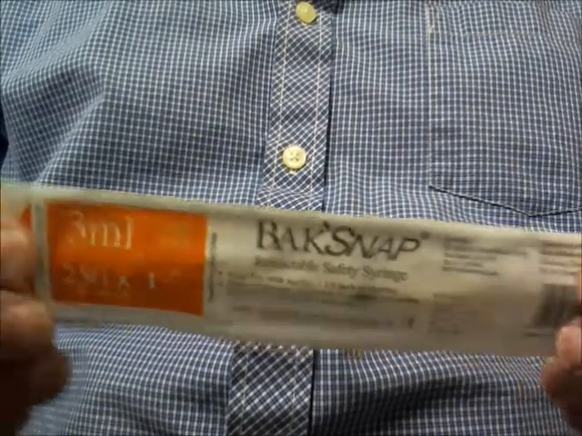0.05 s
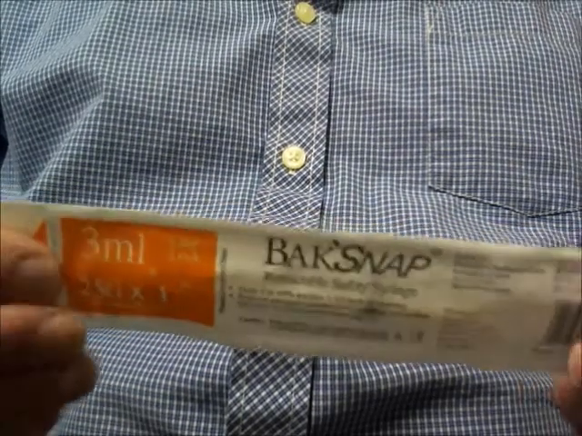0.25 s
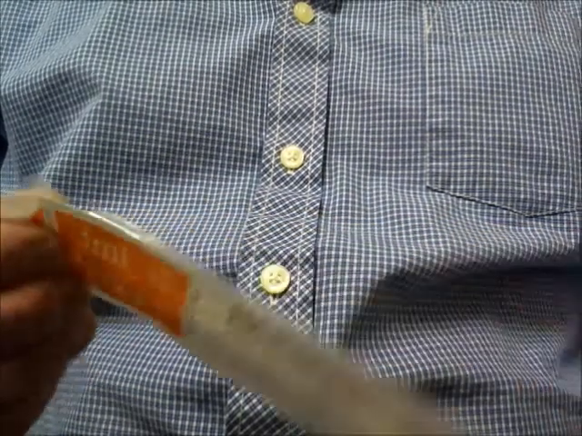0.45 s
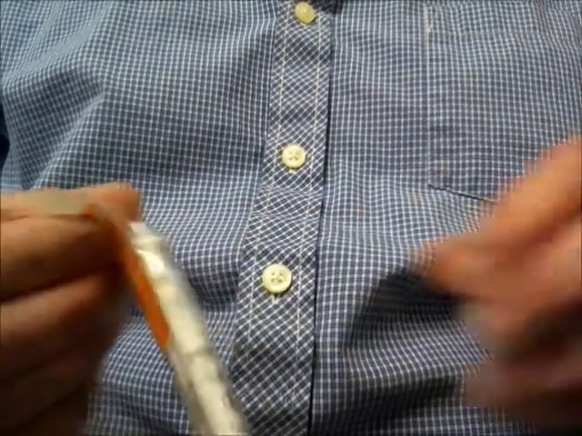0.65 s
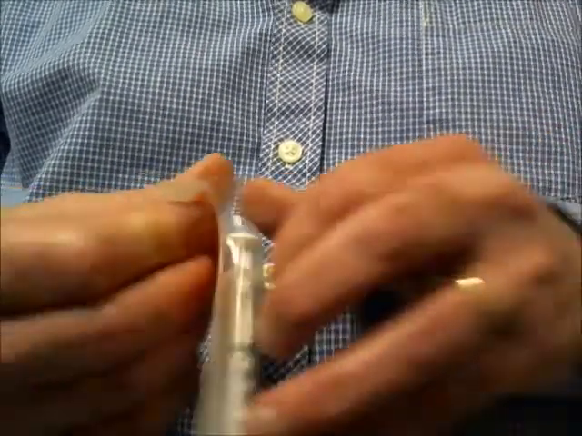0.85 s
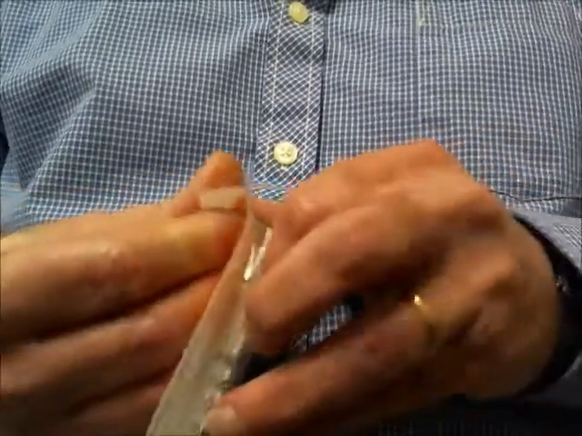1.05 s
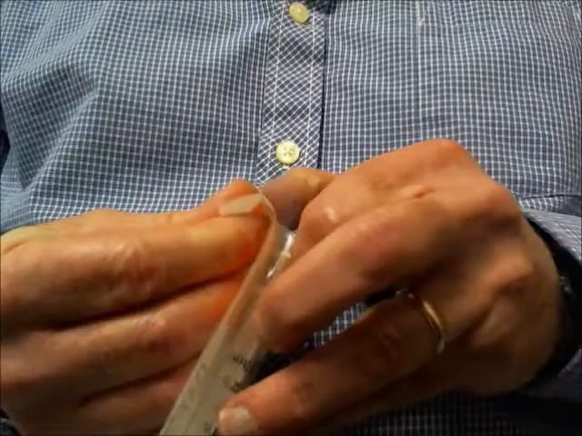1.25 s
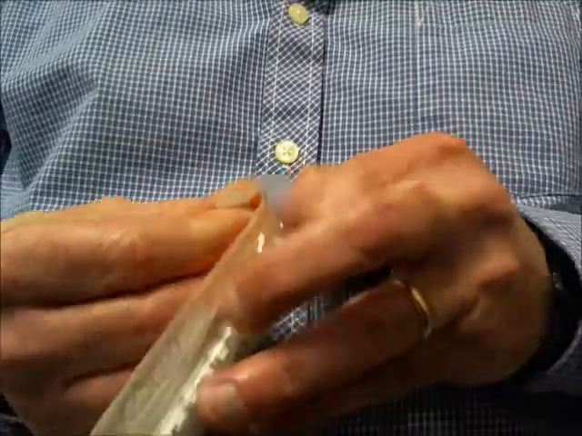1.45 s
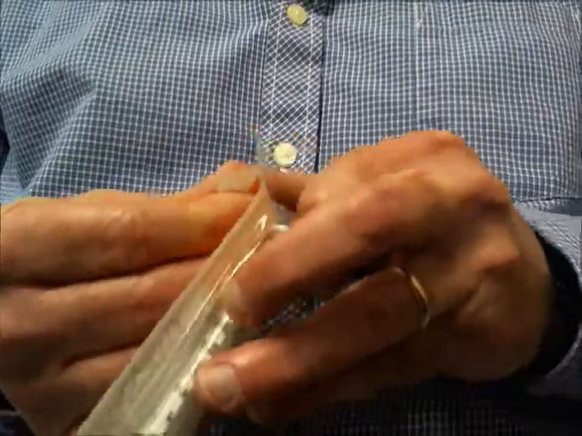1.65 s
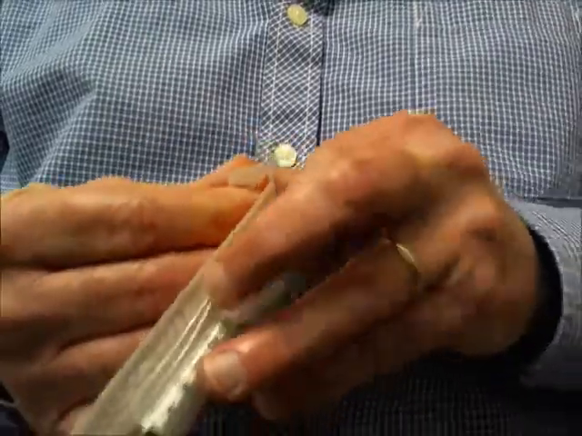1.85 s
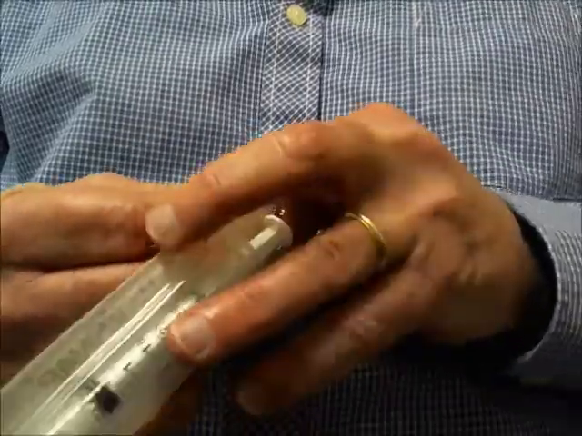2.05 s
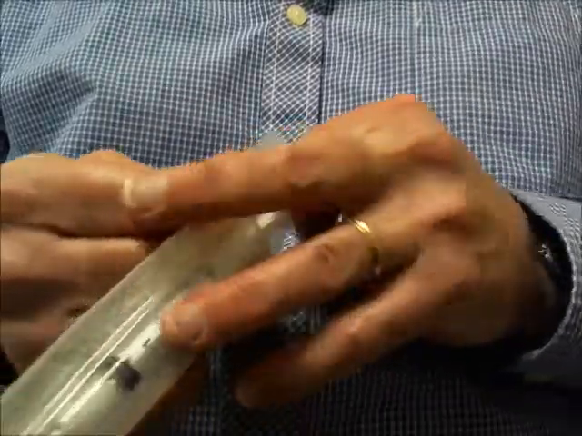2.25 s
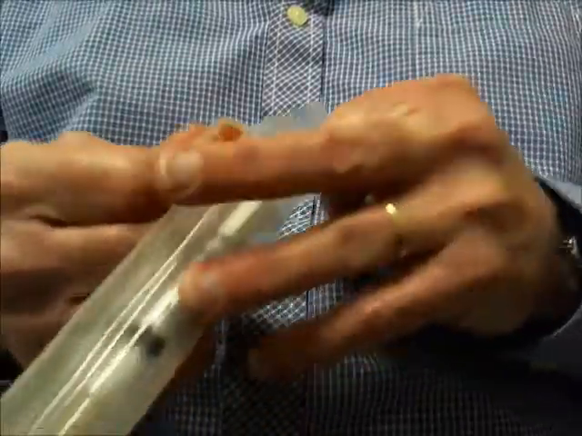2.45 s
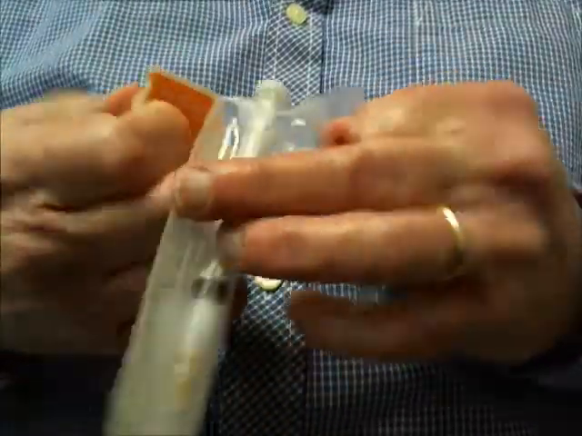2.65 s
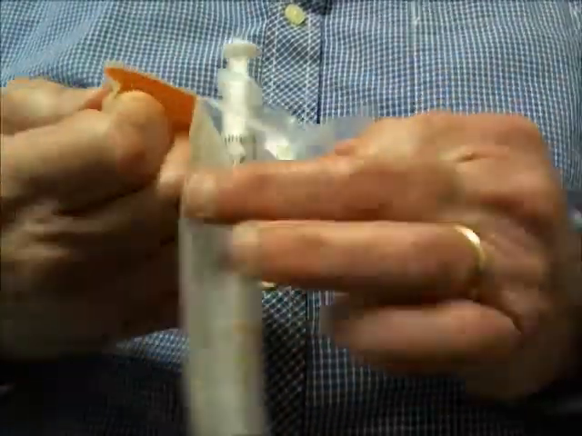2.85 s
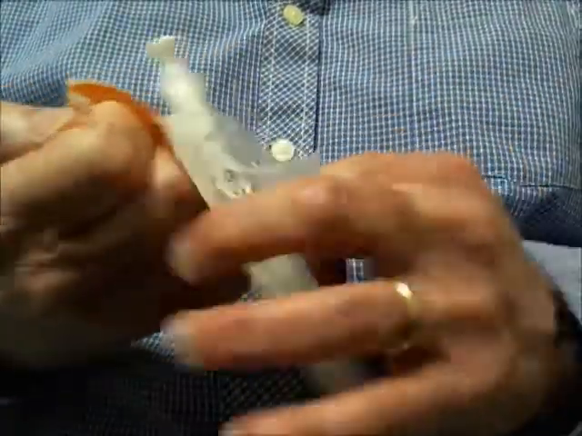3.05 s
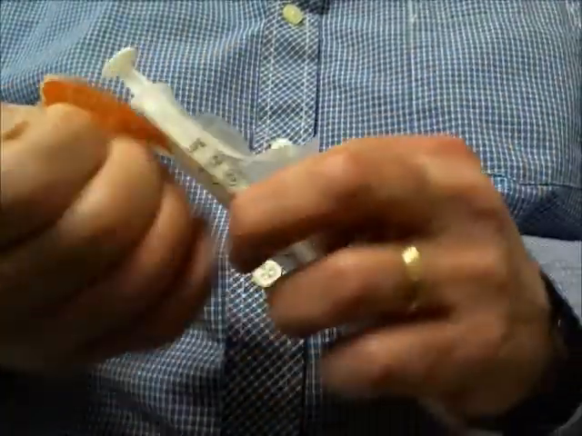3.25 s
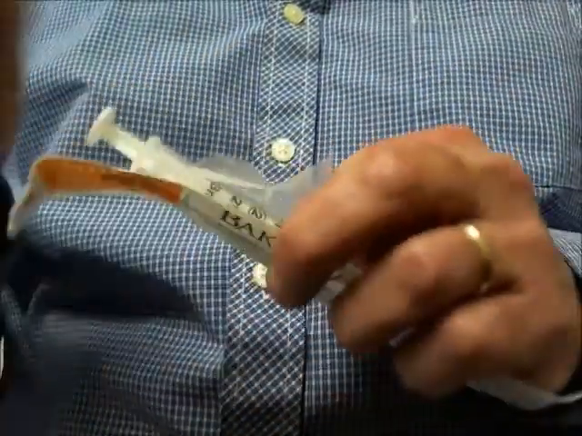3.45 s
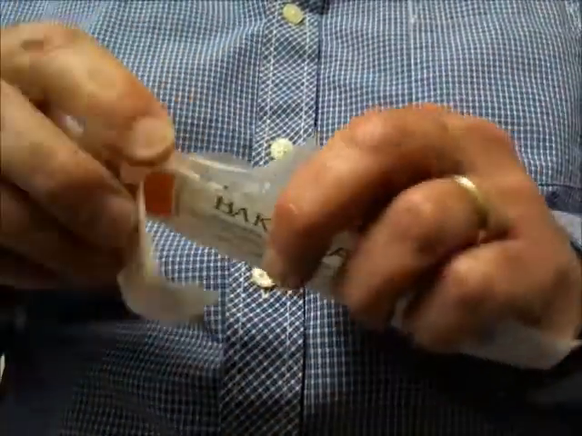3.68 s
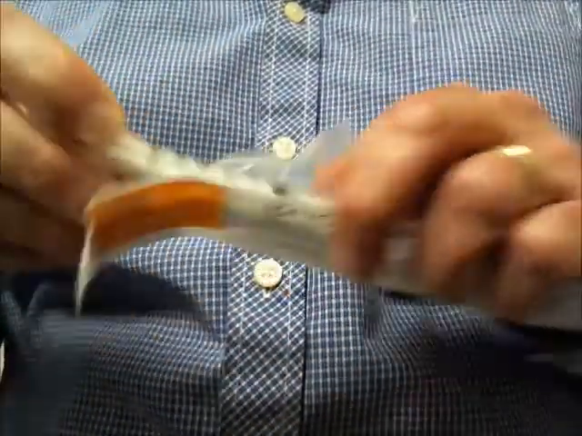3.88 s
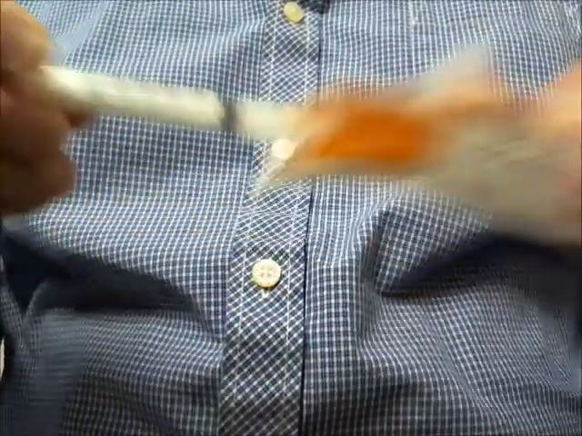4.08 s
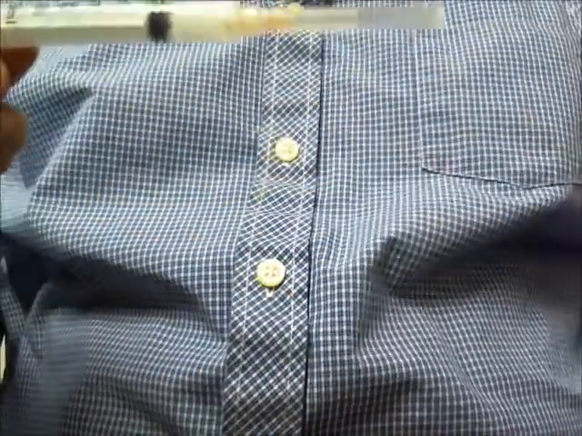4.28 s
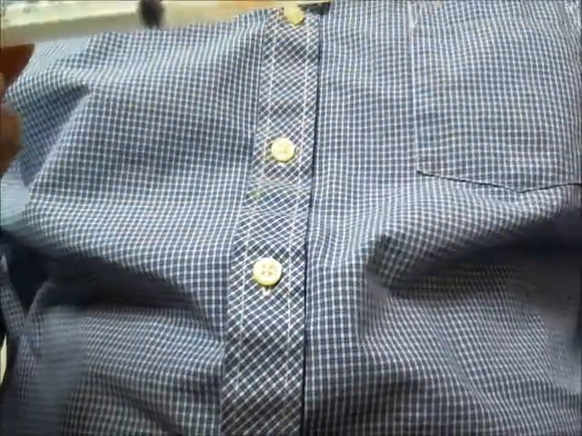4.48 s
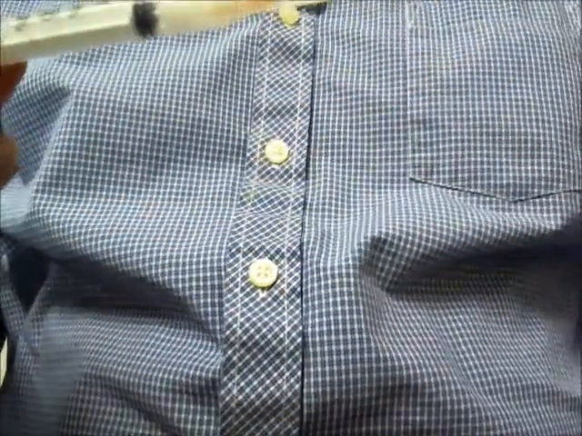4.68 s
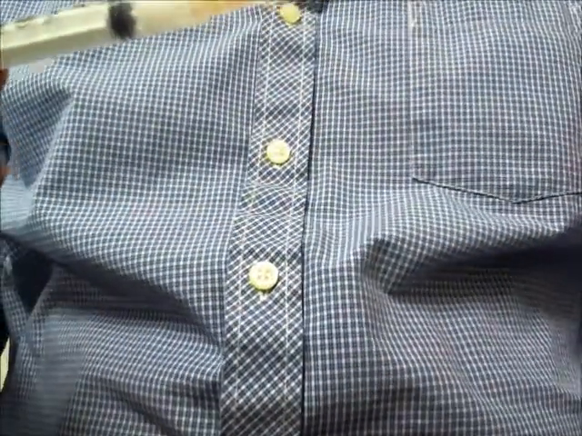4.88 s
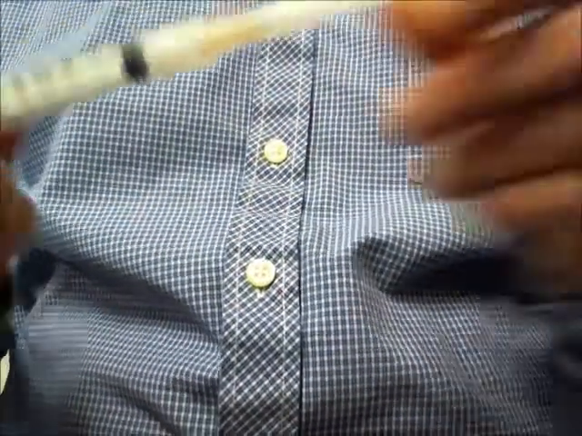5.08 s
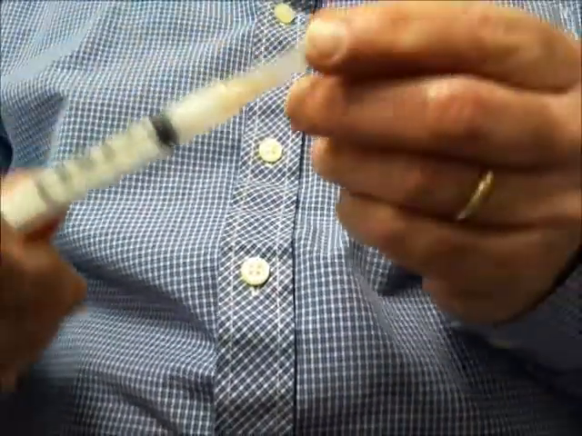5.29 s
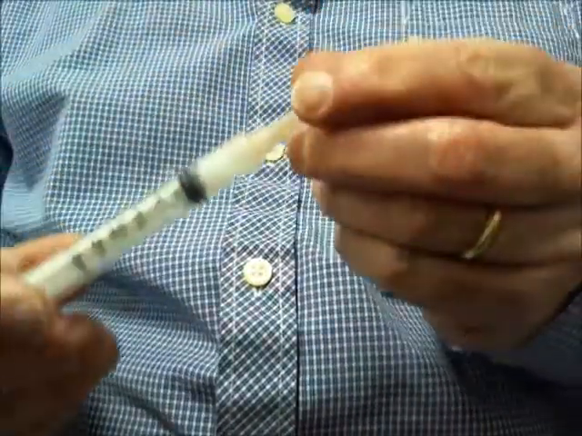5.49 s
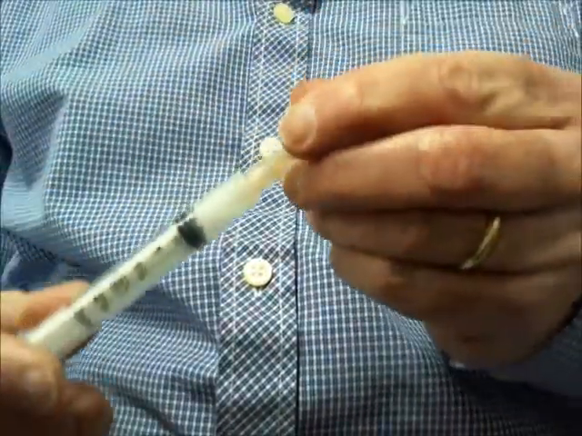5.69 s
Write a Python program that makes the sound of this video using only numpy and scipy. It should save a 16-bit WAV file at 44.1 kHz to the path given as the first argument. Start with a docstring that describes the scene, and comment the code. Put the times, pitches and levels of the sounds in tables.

```python
"""A quiet room hums first; then, close to a small microphone, hands peel open a paper-and-film pouch
and draw out a plastic syringe. Creases in the film snap as noise bursts through a resonance; the seal
tears as clumped random slips ringing many small facets, and slips and snaps ring the paper's low modes.
The loudest snaps overload the recorder. Near the end a soft far bump is followed by fingers ticking
on the cap, made as longer, sharper snaps."""
import sys
import numpy as np
from scipy import signal
from scipy.fft import rfft, irfft
from scipy.io import wavfile

SR = 44100
rng = np.random.default_rng(int(sys.argv[2]) if len(sys.argv) > 2 else 0)


def digitize_waveform(pressure):
    """Quantize a signal to 16-bit integers and store it at the path in sys.argv[1].

    Rows of a 2-D input are taken as channels; values are limited to [-1, 1].
    """
    field = np.atleast_2d(pressure).T
    bounded = np.clip(field, -1, 1)
    quanta = np.round(bounded * 32767).astype(np.int16)
    wavfile.write(sys.argv[1], SR, quanta)


N = 252574

# Background noise spectrum, relative density: frequency_hz, density_db
ROOM_SPECTRUM = [(30, -30), (70, -11), (170, -2.5), (300, -9), (600, -22.5), (1200, -25.5), (6500, -27.5),
                 (7600, -43), (9000, -47), (14000, -63.5)]
# Mains hum and electronic whine: frequency_hz, rms_db
STEADY_TONES = [(240, -74), (8000, -82.5)]
# Hand moves that bend or peel the pouch: start_s, hold_s, film_crackle_db, paper_slip_db
HAND_MOVES = [(0.174, 0.091, -59.5, -63), (0.267, 0.14, -46, -39), (0.466, 0.13, -56.5, -62),
              (0.629, 0.012, -53.5, -66), (0.733, 0.0058, -37.5, -23), (0.79, 0.076, -41.5, -47),
              (0.852, 0.1, -36, -29), (1.01, 0.097, -43.5, -57), (1.107, 0.096, -49, -53),
              (1.24, 0.076, -31.5, -34), (1.333, 0.055, -33, -35), (1.413, 0.068, -37, -34.5),
              (1.526, 0.0085, -54.5, -38), (1.633, 0.025, -39, -54), (1.724, 0.068, -42.5, -48),
              (1.798, .11, -26.5, -35), (1.894, 0.14, -40.5, -45.5), (2.055, 0.029, -38, -33.5),
              (2.208, 0.068, -14, -11), (2.28, .07, -27.5, -21), (2.363, 0.066, -22.5, -12),
              (2.464, 0.26, -32.5, -25), (2.6, 0.07, -18, -12), (2.712, 0.077, -52.5, -46),
              (2.79, 0.049, -32, -26), (2.888, 0.086, -50, -37.5), (2.997, 0.091, -29.5, -34),
              (3.134, 0.099, -41, -48), (3.483, 0.042, -59.5, -38.5), (3.71, 0.16, -30.5, -30),
              (3.898, 0.1057, -23.5, -28.5), (3.987, 0.023, -20.5, -38.5), (4.041, 0.012, -30.5, -54),
              (4.125, 0.12, -44.5, -62), (4.269, 0.076, -44, -38), (4.458, 0.015, -54, -41),
              (4.515, .06, -33.5, -29), (4.577, 0.021, -29, -18.5), (4.608, 0.1, -42.5, -36.5),
              (4.767, 0.01, -42, -49)]
# Colour of the film sounds at the microphone, relative density: frequency_hz, density_db
FILM_SPECTRUM = [(150, -35.5), (300, -19), (700, -10.5), (1800, -4.5), (3300, -0.5), (4800, -1.5),
                 (6500, -1), (7500, -9), (11300, -13), (12600, -44.5), (16000, -58.5)]
# Low modes of the pouch's paper backing: frequency_hz, width_hz, gain_db
PAPER_MODES = [(251.5, 74, -13.5), (506, 93, -8.5), (679, 150, -4.5), (900, 460, 1), (1400, 350, -3),
               (1850, 1000, -8.5)]
# Film creases snapping through: start_s, peak_db, ring_hz
CREASE_SNAPS = [(0.2702, 9, 4400), (0.304, -28, 3240), (0.315, -20, 3980), (0.3573, 6.5, 5250),
                (0.3817, -27, 5500), (0.4138, -16.5, 1750), (0.478, -24, 4240), (0.5688, -25, 4940),
                (0.7345, -2, 4920), (0.8007, -14, 4830), (0.814, -14, 4060), (0.831, -7.5, 4400),
                (0.8706, -10, 3820), (0.8859, -2, 4450), (0.892, -3, 4330), (0.9095, 2.5, 3220),
                (0.9304, -3, 3500), (0.9502, -16, 4200), (0.959, -26, 3580), (0.998, -14, 3700),
                (1.0048, 1.5, 5140), (1.0237, -9, 5200), (1.1158, -13, 4930), (1.131, -12, 4000),
                (1.1544, -10, 4180), (1.1643, -2, 4100), (1.1696, -11.5, 3570), (1.2191, -1.5, 3850),
                (1.256, -15, 3720), (1.2919, -3.5, 3360), (1.339, -14, 3980), (1.3522, -11, 4240),
                (1.3584, -15, 4000), (1.3808, -12, 3700), (1.4401, -6, 3870), (1.457, 4.5, 3860),
                (1.605, -28.5, 3280), (1.6287, -11, 4500), (1.7409, -18, 3650), (1.8022, 0, 4870),
                (1.813, 1.5, 3750), (1.8438, 2, 3560), (1.854, 11, 5400), (1.892, -5, 4470),
                (1.9674, -19, 5330), (1.9811, 3, 6040), (2.0673, -14, 4760), (2.1454, -21, 4440),
                (2.1819, -0.5, 4430), (2.1936, -10, 4070), (2.206, 5, 4270), (2.2177, -4.5, 3870),
                (2.224, 8, 4500), (2.2607, 3, 4430), (2.2769, -4, 4340), (2.2855, -2, 4800),
                (2.3091, -3.5, 3450), (2.3184, 3, 3900), (2.3619, 8, 4500), (2.3656, 7.5, 3930),
                (2.3783, 7, 2870), (2.3907, 0.5, 4440), (2.4017, -8, 4270), (2.409, 3, 4700),
                (2.4363, 1.5, 4040), (2.478, -5.5, 3756), (2.5114, 1, 4900), (2.5475, -9, 3910),
                (2.5573, -8, 3030), (2.611, 0.5, 4050), (2.6327, -3, 5350), (2.6444, -3, 5050),
                (2.6553, 2.5, 4640), (2.6928, -11.5, 6800), (2.7374, -8, 4720), (2.7827, -15.5, 3485),
                (2.804, -10, 2500), (2.8366, -2, 4830), (2.9076, -8.5, 3600), (2.95, -13.5, 2950),
                (2.9984, -7, 5100), (3.0321, 3.5, 5450), (3.1027, 0.5, 5700), (3.19, -6.5, 4660),
                (3.2325, -13.5, 6050), (3.3375, -15, 4010), (3.4384, -12, 4120), (3.6379, -1, 5250),
                (3.6503, -14, 3800), (3.6982, -11, 4300), (3.7085, -7.5, 6860), (3.7159, -12.5, 3370),
                (3.7252, -7, 5960), (3.8027, 8, 4500), (3.8573, -3.5, 4120), (3.9938, 1, 5030),
                (4.041, -9.5, 5500), (4.0469, -6.5, 5700), (4.1344, -11.5, 4700), (4.156, -20.5, 3770),
                (4.1751, -18.5, 4570), (4.2038, -14.5, 4300), (4.2919, -12, 5900), (4.342, -26.5, 4440),
                (4.37, -24.5, 5830), (4.44, -34, 1400), (4.5074, -20.5, 5940), (4.5369, 1, 3940),
                (4.576, 2.5, 4770), (4.6614, -11, 4040), (4.6713, -21, 4650), (4.7016, -12.5, 4670),
                (4.8657, -32.5, 5360), (4.9084, -35, 9100)]
# One soft far bump: start_s, end_s, frequency_hz, top_rms_db
FAR_BUMP = (5.055, 5.15, 180, -52)
# Fingers on the plastic cap: start_s, peak_db, ring_hz
CAP_TICKS = [(5.1262, -39, 3310), (5.5007, -49.5, 4780), (5.5378, -46.5, 2690), (5.58, -49, 2560),
             (5.6342, -45.5, 1400), (5.7157, -35.5, 2580)]

ROOM_TONE_DB = -64  # rms
ONSET_DB_PER_S, SETTLE_DB_PER_S = 1198.5, 1001  # how fast a move builds and dies away
BEFORE_DB_PER_S, AFTER_DB_PER_S = 2497.5, 700.5  # how fast small sounds build to a snap and die after it
AFTER_FILM_DB, AFTER_PAPER_DB = -37.5, -32  # small sounds around a snap, relative to its peak
SLIP_MS, FACET_Q = 1, 2.6  # decay time of a small slip; sharpness of the small facets
KNOCK_DB, GRIP_SWING_DB = 0.5, 3.5  # how hard snaps knock the paper; rms swing of each paper mode
ROOM_T60_S, ROOM_DB = 0.058, -41
ECHO_S, ECHO_DB = 0.012, -45.5
CUTOFF_HZ = 16800


def from_db(db):
    """The decibel is logarithmic: 20 dB is a factor of ten in amplitude."""
    return 10 ** (np.asarray(db) / 20)


def rms_one(x):
    """Root-mean-square amplitude measures mean power; scale it to one."""
    return x / np.sqrt(np.mean(x ** 2) + 1e-20)


def colour(x, spectrum, size=2048):
    """A minimum-phase filter is fixed by its magnitude: fold the cepstrum onto positive time."""
    hz, db = np.transpose(spectrum)
    grid = np.maximum(np.arange(size // 2 + 1) * SR / size, 1)
    magnitude = from_db(np.interp(np.log(grid), np.log(hz), db))
    cepstrum = irfft(np.log(magnitude))
    cepstrum[1:size // 2] *= 2
    cepstrum[size // 2 + 1:] = 0
    impulse_response = irfft(np.exp(rfft(cepstrum)))
    return signal.fftconvolve(x, impulse_response)[:len(x)]


def resonate(x, hz, width_hz):
    """A damped mode is a two-pole resonance whose width sets its decay; gain at the top is 1."""
    r = np.exp(-np.pi * width_hz / SR)
    feedforward = [(1 - r * r) / 2, 0, (r * r - 1) / 2]
    feedback = [1, -2 * r * np.cos(2 * np.pi * hz / SR), r * r]
    return signal.lfilter(feedforward, feedback, x + 1e-18)


def drift(rate_hz):
    """Slow random variation is low-passed white noise, here of rms 1."""
    r = np.exp(-2 * np.pi * rate_hz / SR)
    wander = signal.lfilter([1], [1, -2 * r, r * r], rng.standard_normal(N + SR))
    return rms_one(wander[SR:])  # the first second lets the filter settle


def room_tone():
    """Steady room noise is random pressure with a sloping spectrum."""
    return from_db(ROOM_TONE_DB) * rms_one(colour(rng.standard_normal(N), ROOM_SPECTRUM))


def hum_and_whine():
    """A steady tone is a sinusoid with a peak of root two times its rms."""
    t = np.arange(N) / SR
    return sum(np.sqrt(2) * from_db(db) * np.sin(2 * np.pi * hz * t) for hz, db in STEADY_TONES)


def activity(move_db, after_db):
    """Independent sources add in power: moves build, hold and settle; snaps are led in and leave trails."""
    t = np.arange(0, N + 64, 64) / SR
    start, hold = np.transpose(HAND_MOVES)[:2, :, None]
    snap_s, peak_db = np.transpose(CREASE_SNAPS)[:2, :, None]
    onset = ONSET_DB_PER_S * np.maximum(start - t, 0)
    settling = SETTLE_DB_PER_S * np.maximum(t - start - hold, 0)
    moves = move_db[:, None] - onset - settling
    slope = np.where(t >= snap_s, AFTER_DB_PER_S, BEFORE_DB_PER_S)
    trails = peak_db + after_db - slope * np.abs(t - snap_s)
    power = np.sum(from_db(2 * moves), axis=0) + np.sum(from_db(2 * trails), axis=0) + 1e-12
    return np.interp(np.arange(N) / SR, t, 10 * np.log10(power))


def clicks(per_s, spread_db):
    """Stick-slip friction releases in random impulses, many small and few large."""
    sizes = from_db(spread_db * np.minimum(rng.exponential(1, N), 4))
    signs = rng.choice([-1, 1], N)
    return sizes * signs * (rng.random(N) < per_s / SR)


def crackle(level_db):
    """Tearing is clustered stick-slip: slips and rubbing ring facets of many sizes that come and go."""
    slips = clicks(600 * from_db(5 * drift(74)), spread_db=4.0)
    rub = from_db(-8 + 5 * drift(40))
    dealt = rng.integers(0, 10, N)  # which facet each slip excites
    fade = np.exp(-1000 / SLIP_MS / SR)
    rings = np.zeros(N)
    for k, hz in enumerate(np.geomspace(2600, 9000, 10)):
        slip_envelope = rms_one(signal.lfilter([1], [1, -fade], np.abs(slips) * (dealt == k)))
        drive = rng.standard_normal(N) * (slip_envelope + rub)
        ring = resonate(resonate(drive, hz, hz), hz, hz / FACET_Q)
        rings += from_db(2.9 * drift(8.2)) * ring
    mix = rms_one(rings) + from_db(-19.5) * rms_one(slips)
    return from_db(level_db) * rms_one(colour(mix, FILM_SPECTRUM))


def creak(level_db, knocks):
    """Forced modes of a flexed sheet: slips and snaps ring the paper, each mode varying as the grip shifts."""
    slips = rms_one(clicks(1200 * from_db(1.3 * drift(22)), spread_db=5.0))
    drive = from_db(level_db) * slips + from_db(KNOCK_DB) * knocks
    creaking = np.zeros(N)
    for hz, width_hz, gain_db in PAPER_MODES:
        ring = resonate(resonate(drive, hz, 3 * width_hz), hz, width_hz)
        creaking += from_db(gain_db + GRIP_SWING_DB * drift(7.2)) * ring
    return creaking


def snaps(rows, length_ms, sharpness, broad_db, size=1024):
    """Sudden release excites resonance: a short noise burst rings each facet and is also heard directly."""
    out = np.zeros(N + size)
    ms = np.arange(size) / SR * 1000
    for start_s, peak_db, ring_hz in rows:
        decay_ms = length_ms * from_db(rng.normal(0, 3.0))  # each burst has its own length
        burst = rng.standard_normal(size) * np.minimum(ms / 0.16, 1) * np.exp(-ms / decay_ms)
        ring = resonate(burst, ring_hz, ring_hz / sharpness)
        sound = colour(ring + from_db(broad_db) * burst, FILM_SPECTRUM)
        at = round(start_s * SR)
        out[at:at + size] += from_db(peak_db) * sound / np.abs(sound).max()
    return out[:N]


def room(x):
    """Reverberation is convolution: a short tail from the nearest surfaces and one smeared wall echo."""
    t = np.arange(SR // 4) / SR
    tail = from_db(ROOM_DB - 60 * t / ROOM_T60_S) * np.clip(t / 0.0013, 0, 1)
    echo = from_db(ECHO_DB) * np.exp(-((t - ECHO_S) / 0.0007) ** 2)
    reflections = rms_one(resonate(rng.standard_normal(len(t)), 3500, 5000)) * (tail + echo)
    return signal.fftconvolve(x, reflections)[:N]


def far_bump():
    """A dull impact is narrow low-frequency noise, here under a half-sine envelope."""
    t = np.arange(N) / SR
    start, end, hz, db = FAR_BUMP
    shape = np.sin(np.pi * np.clip((t - start) / (end - start), 0, 1))
    noise = resonate(resonate(rng.standard_normal(N), hz, hz / 2), hz, hz / 2)
    return from_db(db) * shape * rms_one(noise)


def scene():
    """Superposition: direct sound of pouch and cap, its reflections, and the background add."""
    background = room_tone() + hum_and_whine()
    film_db, paper_db = np.transpose(HAND_MOVES)[2:]
    creases = snaps(CREASE_SNAPS, length_ms=0.89, sharpness=2.6, broad_db=-23.5)
    tearing = crackle(activity(film_db, AFTER_FILM_DB))
    flexing = creak(activity(paper_db, AFTER_PAPER_DB), creases)
    cap = snaps(CAP_TICKS, length_ms=1.6, sharpness=6.7, broad_db=-16.5)
    direct = creases + tearing + flexing + cap
    return (direct + room(direct) + background + far_bump())[None]


def record(dry):
    """Overload clips the peaks; band limits then soften the bass and treble and cut the top."""
    clipped = np.clip(dry, -1, 1)
    band = signal.butter(2, [70, 12500], "band", fs=SR, output="sos")
    top_cut = signal.cheby2(10, 60, CUTOFF_HZ, fs=SR, output="sos")
    return signal.sosfilt(top_cut, signal.sosfilt(band, clipped))


dry = scene()
out = record(dry)
digitize_waveform(out)
```